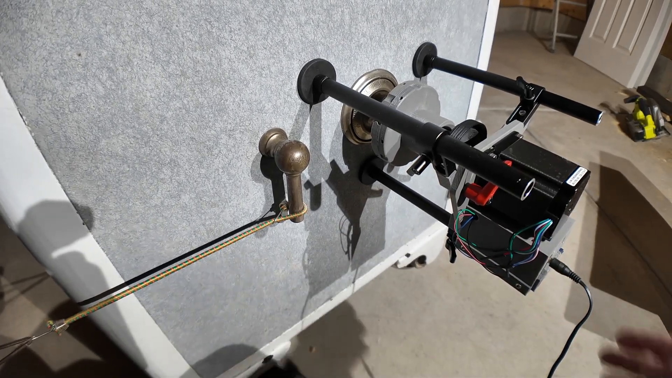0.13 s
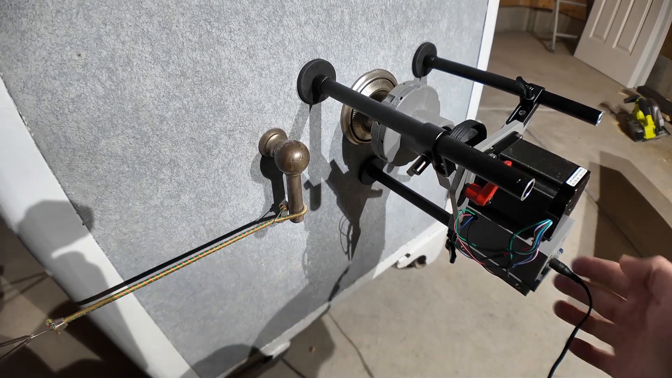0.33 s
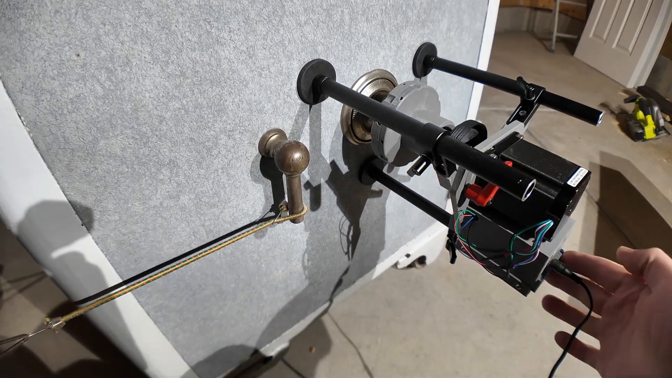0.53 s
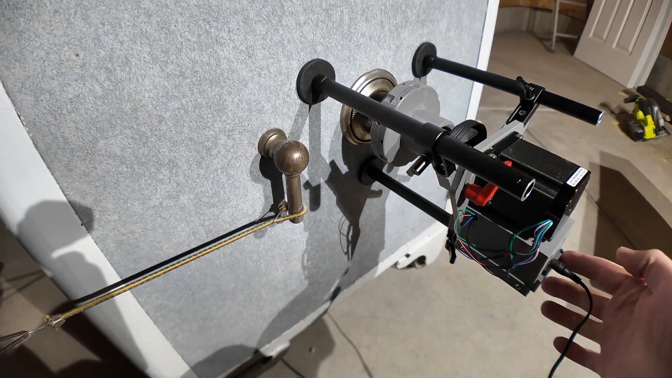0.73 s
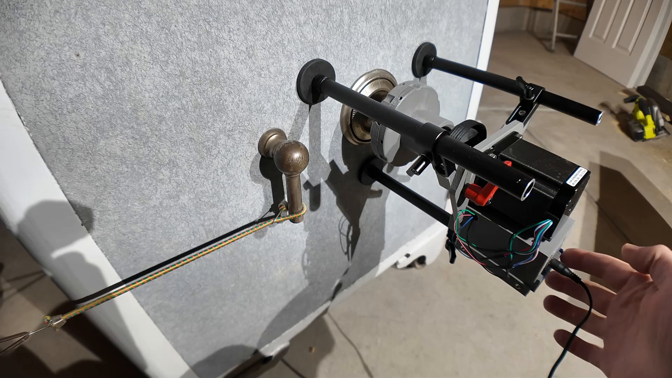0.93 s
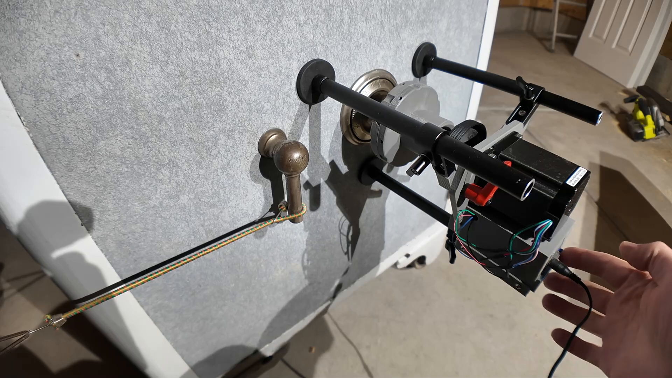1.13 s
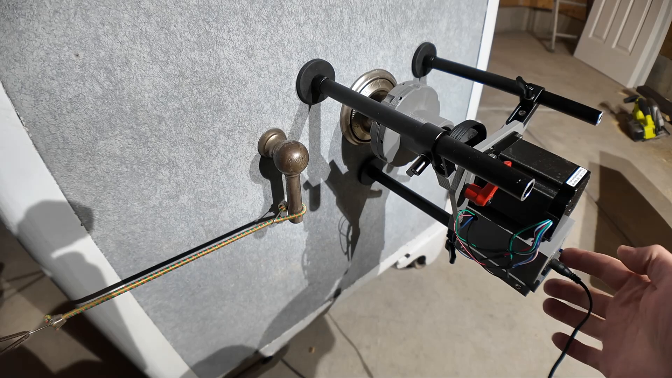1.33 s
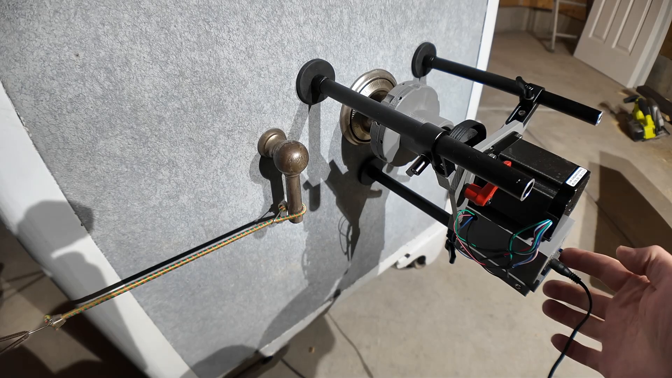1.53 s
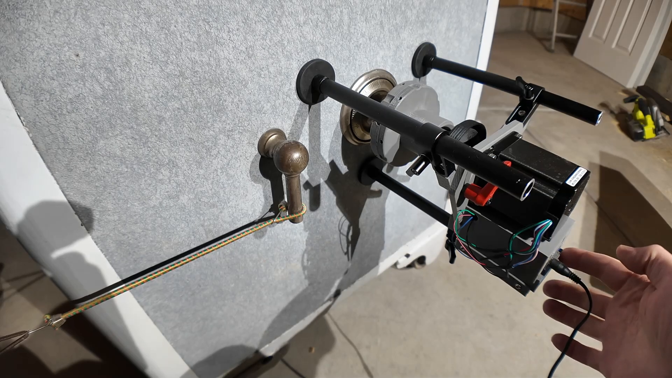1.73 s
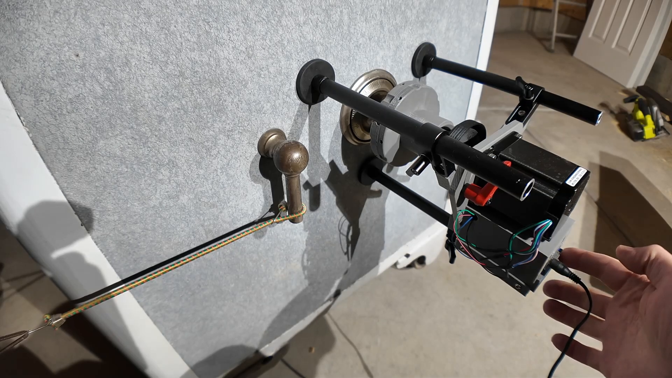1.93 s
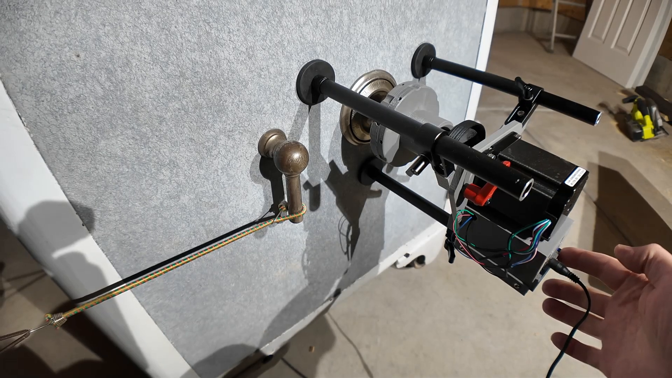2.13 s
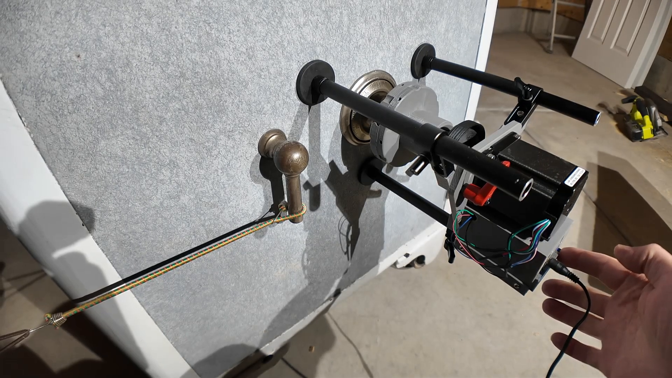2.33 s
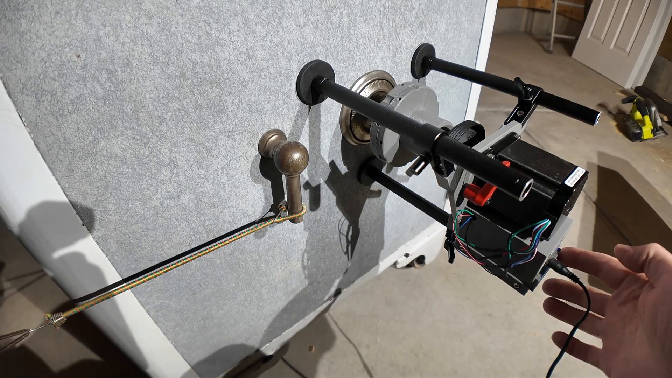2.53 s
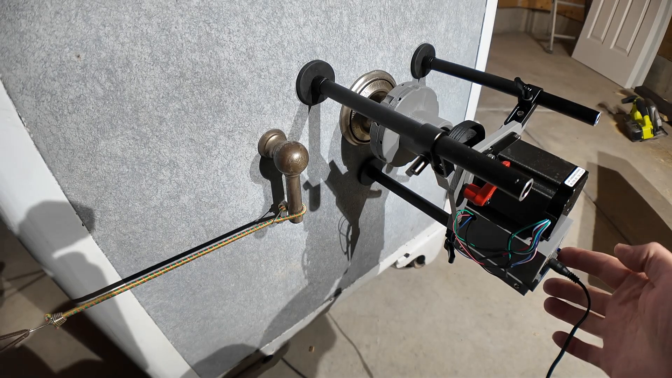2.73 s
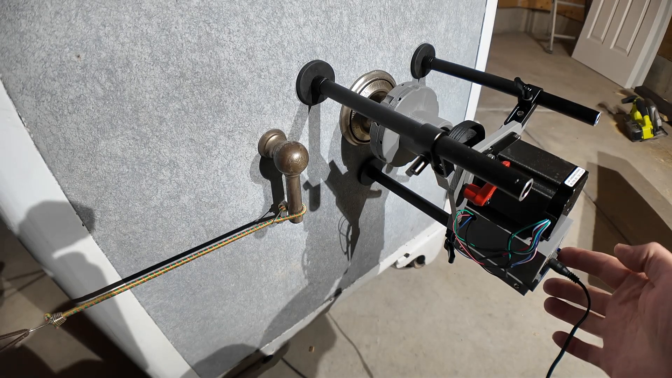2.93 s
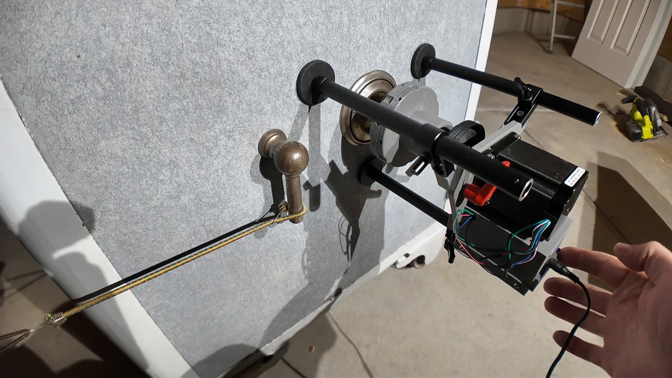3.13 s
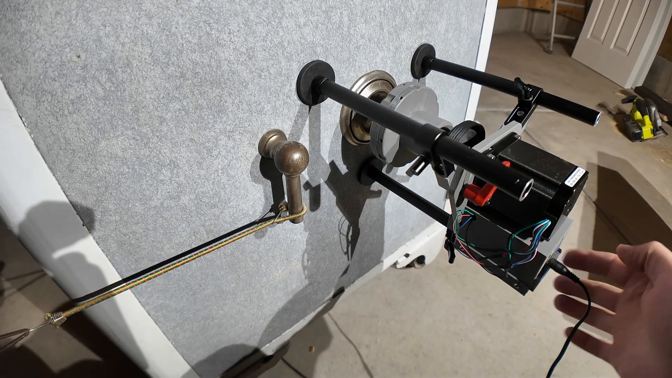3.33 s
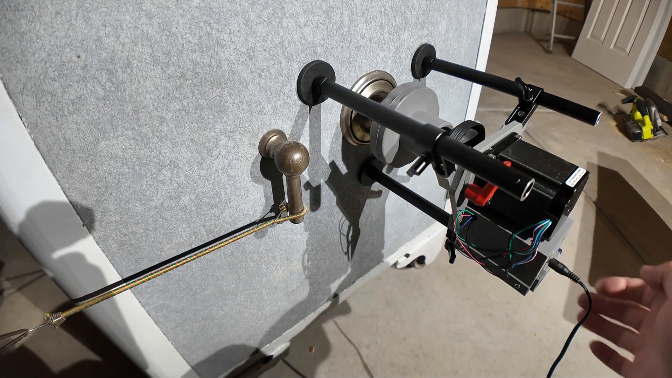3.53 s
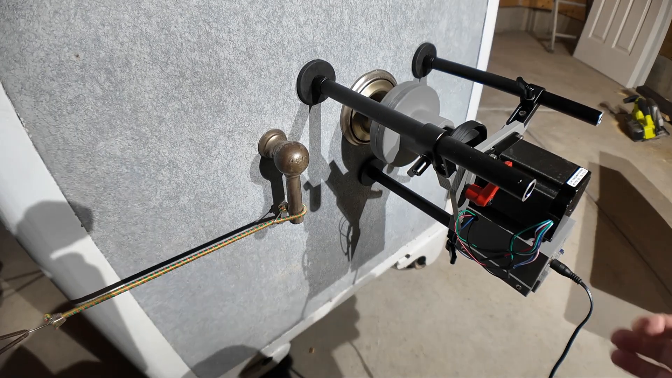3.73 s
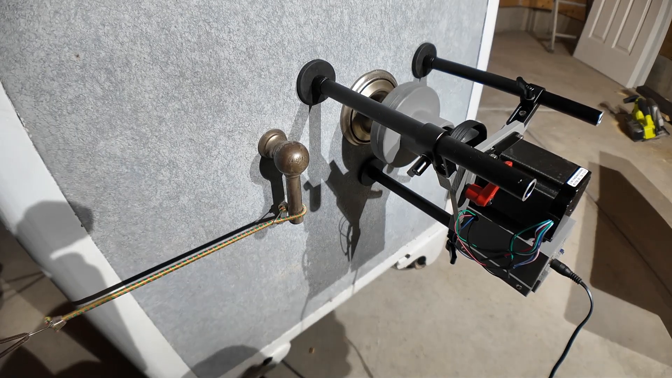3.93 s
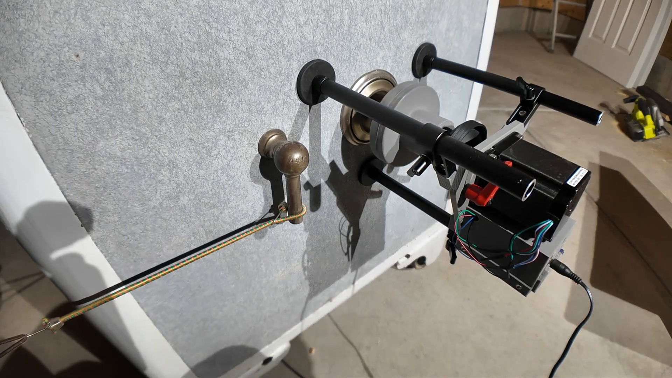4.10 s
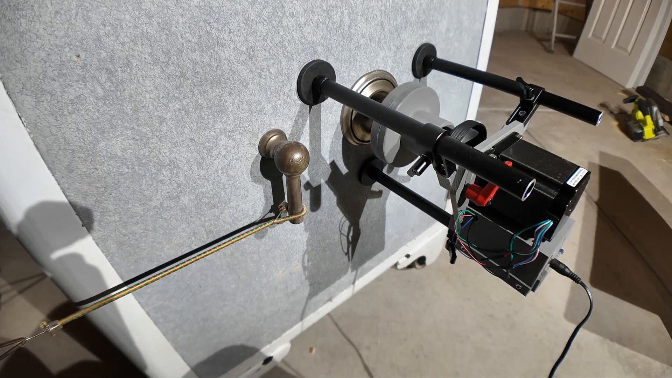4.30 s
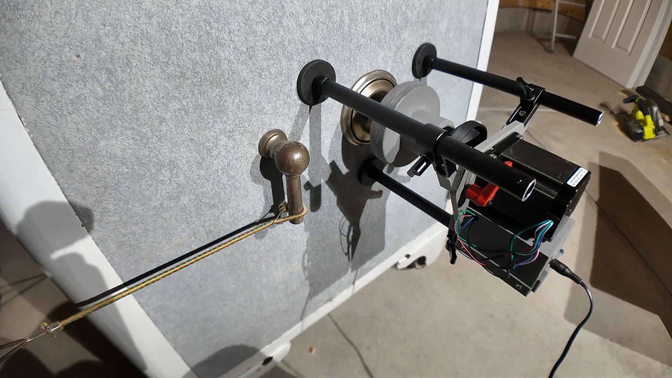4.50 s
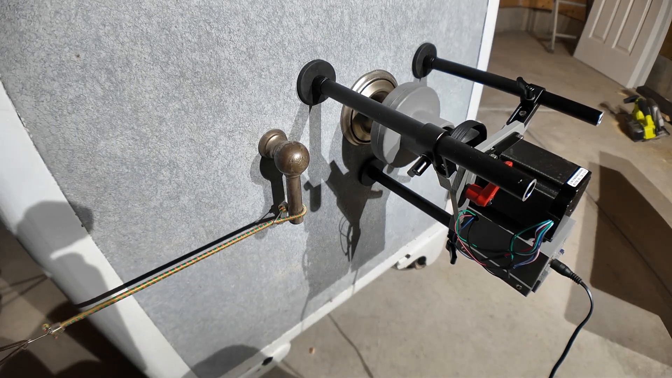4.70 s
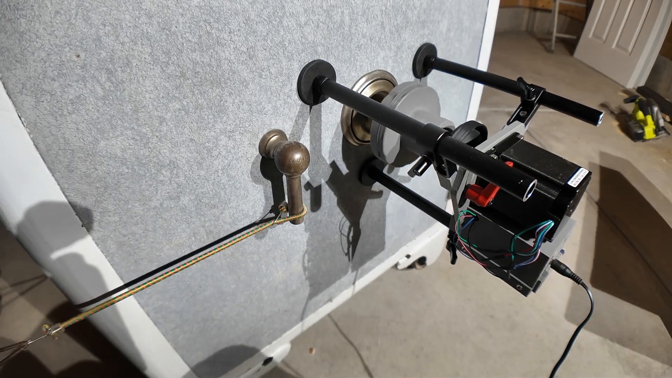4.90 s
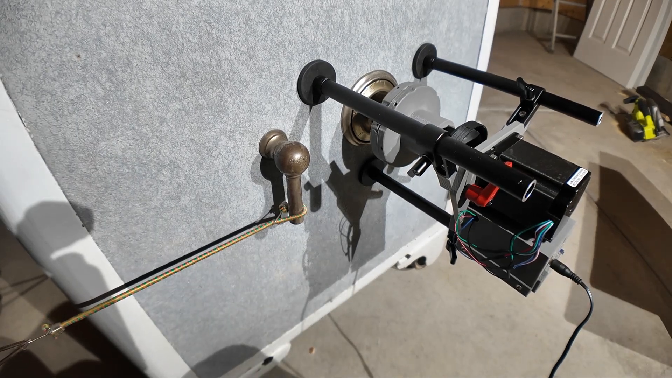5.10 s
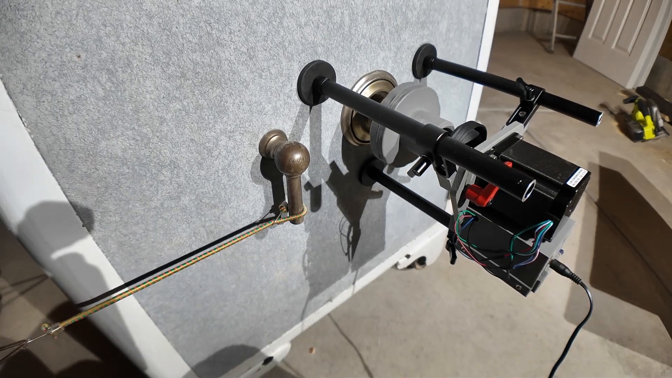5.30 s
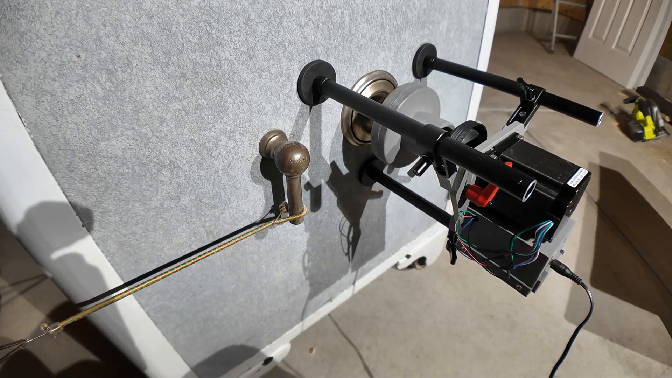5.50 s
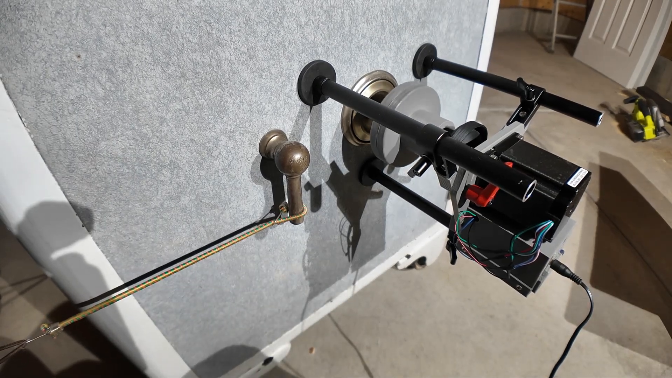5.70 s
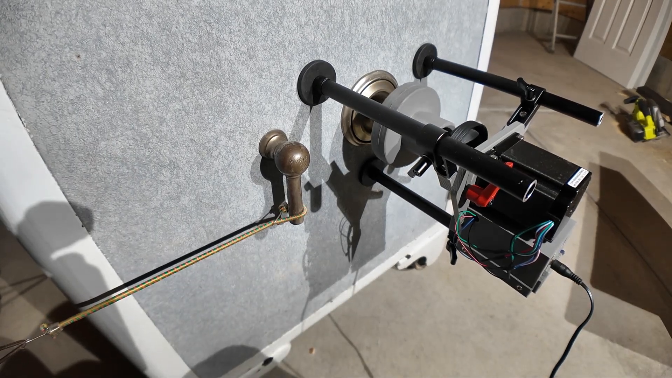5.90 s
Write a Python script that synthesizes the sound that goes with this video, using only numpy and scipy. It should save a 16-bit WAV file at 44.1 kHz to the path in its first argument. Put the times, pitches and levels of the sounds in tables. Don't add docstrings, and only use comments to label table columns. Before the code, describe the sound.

A few small plastic clicks, a quiet pause, then a ticking, buzzing stepper motor turns a metal lock dial one way and back.

```python
import sys
import numpy as np
from scipy import signal
from scipy.fft import rfft, irfft, next_fast_len
from scipy.io import wavfile

SR = 44100
rng = np.random.default_rng(int(sys.argv[2]) if len(sys.argv) > 2 else 0)


def gain_from_db(level_db):
    decades = np.asarray(level_db, float) / 20
    return 10 ** decades


def transcribe(signal):
    frames = np.atleast_2d(signal).T
    limited = np.clip(frames, -1, 1)
    pcm = np.round(limited * 32767).astype(np.int16)
    wavfile.write(sys.argv[1], SR, pcm)


N = 262395

# (frequency [Hz], density [dB per Hz])
AIR_SPECTRUM = [(18, -56), (30, -48), (47, -20), (88, -0.5), (117, -10.5), (148, -4.5), (188, -17.5),
                (214, -10), (317, -17.5), (677, -19), (880, -19), (10900, -35), (15700, -26.5)]
AIR_DB = -55.5
# (frequency [Hz], correlation [-1 to 1])
AIR_CORRELATION = [(60, 1), (240, -0.14), (950, -0.45), (3770, 0.3), (15000, -0.43)]
MAINS_DB = [-72.5, -78, -75.5]
# (time [s], spread [s], level [dB])
MAINS_SWELLS = [
    [(.5, 0.37, -62), (1.7, 0.21, -64), (4.09, .06, -84)],
    [(.53, 0.14, -63.5), (1.3, 0.13, -61), (1.77, 0.081, -57), (2.25, .22, -55.5), (4.5, .08, -76),
     (5.3, 0.095, -52)],
    [(.15, 0.11, -69), (3.15, 0.2, -57), (3.6, 0.049, -55), (4.05, 0.19, -60.5), (5.15, 0.37, -53.5),
     (5.7, .15, -62)],
]
MAINS_HZ = 59.2

ROOM_T60_S, ROOM_DB, EARLY_DECAY_S = 0.37, -9.5, 0.0061
# (frequency [Hz], lead [rad])
LEFT_LEAD = [(100, 0), (5000, .3), (6800, -3.5), (9800, -9.5), (16000, -13)]
# (frequency [Hz], correlation [0 to 1])
SOURCE_CORRELATION = [(60, 0.95), (150, 1), (560, 0.96), (950, 0.94), (2380, 0.7), (5980, 0.32),
                      (15000, 0.055)]
# (frequency [Hz], level [dB])
LEFT_BALANCE = [(60, -3), (150, 1.5), (380, 0), (950, -0.5), (2380, 0.5), (5980, 2), (15000, -2.5)]
BANDWIDTH_HZ = 15740

# (time [s], peak level [dB], low colour [dB], high colour [dB])
TAPS = [
    (0.5142, -48.5, -3, 4),
    (0.7058, -40, 3.5, -7),
    (0.8215, -30, -1, 1),
    (1.0014, -55.5, -5, 12.5),
    (1.2032, -48.5, 17.5, 0),
    (1.2124, -50.5, 6, 6.5),
]
# (frequency [Hz], level [dB], T60 [s], colour group [0 low, 1 mid, 2 high])
BOX_MODES = [(733, 8, 0.062, 0), (604, -3, 0.031, 0), (1120, 13.5, 0.02, 1), (1257, 3, 0.054, 1),
             (2250, 5, 0.0092, 2), (2570, -17, 0.011, 2), (3170, -3, 0.011, 2), (3600, 4, 0.0086, 2),
             (10400, -3, 0.0057, 2)]

# (time [s], level [dB])
JOLTS = [
    (3.39, -50.5),
    (3.88, -54),
    (4.1, -48),
    (4.52, -66),
    (5.11, -58),
    (5.28, -55),
    (5.54, -64),
    (5.71, -61.5),
]
SHUDDER_DB, SHUDDER_SPREAD_S = -64, 0.042
# (frequency [Hz], width [Hz], time [s], spread [s], level [dB])
DOOR_BOOM = (145, 14, 5.4, .13, -55)
# (frequency [Hz], width [Hz], level [dB])
FRAME_MODES = [(690, 64, 20), (1195, 330, -1), (1413, 210, 9.5), (1790, 213, 9.5), (2250, 120, 4.5),
               (2706, 110, 1), (3150, 60, 6), (3453, 21, 9.5), (3630, 24, 1), (4220, 210, -4.5),
               (4650, 19, 9)]

# (time [s], peak level [dB], low colour [dB], high colour [dB])
TICKS = [(3.3759, -21.5, -4, -9.5), (3.391, -25.5, 3, -12), (3.4056, -21, -3, -6.5),
         (3.4309, -23, 3.5, -21), (3.465, -11.5, -6, -4), (3.5937, -40, 15, -3), (3.6222, -25, 5.5, -7),
         (3.643, -25.5, 0, -5), (3.685, -23.5, 1.5, -24), (3.706, -18.5, -11.5, -12),
         (3.7784, -12.5, -4.5, -17), (3.8534, -19, -24, -15), (4.1124, -14.5, -4.5, -27),
         (4.176, -18.5, -11, -45), (4.233, -26, -17, -19), (4.3286, -15, -46, -19.5),
         (4.488, -18.5, -6, -19), (4.565, -19.5, -24, -28), (4.625, -19.5, -31, -22),
         (4.732, -15.5, -24, -31), (4.9204, -20.5, 1.5, -15), (5.268, -37, -4, 1), (5.2964, -16.5, -8, -12),
         (5.458, -46, -20, 8), (5.5767, -16, -5.5, -8), (5.6454, -13.5, -8.5, -24), (5.685, -18, -21, -18),
         (5.7816, -16.5, -16, -15), (5.872, -22, -3, -1.5), (5.922, -17.5, -8.5, -6.5)]
TICK_S = 0.002
# (frequency [Hz], width [Hz], level [dB], angle [turns], swell [dB], first-turn extra [dB])
CHATTER = (5178, 110, -61, -7.3, 15, 10.5)
# (frequency [Hz], density [dB per Hz])
RATTLE_SPECTRUM = [(200, -32), (430, -30), (540, -11), (700, -25), (900, -14.5), (1150, -10.5), (1600, -17),
                   (2300, -9.5), (2750, -16), (3800, -7), (5000, -18), (6500, -21.5), (11000, -26.5),
                   (15500, -43)]
# (time [s], spread [s], level [dB])
BREAKAWAY = (3.43, 0.054, 1.9)
# (frequency [Hz], width [Hz], level [dB], share locked to the steps [0 to 1])
COIL_MODES = [(12050, 300, 0, .75), (15100, 650, -1, .75)]
UPPER_COIL_SLOW_DB = -19

# (time [s], rate [full steps/s])
STEP_RATE = [
    (3.39, 4),
    (3.828, 532.9),
    (4.762, 532.9),
    (5.19, 15),
    (5.612, 532.9),
    (5.95, 532.9),
]
STEPS_PER_TURN, REVERSE_S = 200, 5.19
# (multiple [1], level [dB], wander [dB], dial angle of the swell [turns])
OVERTONES = [(2, -52, 3, .33), (3, -55, 5, .45), (4, -57, 4, .1), (5, -55, 5, .85), (6, -54, 6, .8),
             (7, -55, 5, .37), (9, -58, 4, .3)]
OVERTONE_RAMP_DB, OVERTONE_RUN_DB = -11, 6
# (multiple [1], level [dB])
MICROSTEP_LINES = [(16, -51), (21.5, -57), (24, -58), (32, -56)]
# (frequency [Hz], width [Hz], level [dB])
WHINE_MODES = [(1240, 60, 16.5), (700, 60, 11)]
# (time [s], depth [1], length [s])
CATCHES = [
    (3.857, 1.95, 0.0043),
    (3.976, 1.8, 0.0048),
    (4.161, 0.94, 0.0043),
    (4.208, 1.85, 0.0046),
    (4.534, 1.75, 0.00455),
    (5.765, 0.88, 0.0088),
]
SPEEDING_UP_DB, SPEEDING_UP_HUM_DB = 2, -7.5

# (rate [steps/s], step hum [dB], microstep whine [dB],
# low rattle [dB], high rattle [dB], coil hiss [dB])
BY_SPEED = [(10, -88, -12, -31, -45, -60), (79.5, -72, -40, -31, -42.5, -51),
            (150, -49, -37.5, -39.5, -38.5, -50.5), (196, -45, -35.5, -39, -41.5, -47),
            (292, -41, -38.5, -33, -38, -47), (324, -57.5, -34.5, -39, -37, -46),
            (466, -37.5, -41, -31.5, -29, -40), (530, -28.5, -54, -31.5, -29, -44.5)]
# (angle [turns], hum [dB], low rattle [dB], high rattle [dB], coils [dB])
DIAL_BINDING = [(.03, 0, 3.5, 4, -10.5), (.16, 0.8, 1.6, -0.4, -8.5), (.36, 8.5, 3.5, 2.3, -13),
                (.53, -0.5, 1.4, -0.6, -9.2), (.7, 0.5, 2.5, 2.5, -10), (.8, 1, 1, 0.5, -12),
                (.9, 1.7, 0.2, 0, -10)]
BIND_POWER = 2.8
SLACK_TURNS, BACK_DEPTH = 0.13, 1.07
# (hum [dB], low rattle [dB], high rattle [dB], coils [dB])
BACK_DB = [-11, 1.9, -2, 0.5]
# (time [s], spread [s])
PICKUP_TIME = (3.81, 0.17)
# (hum [dB], low rattle [dB], high rattle [dB], coils [dB])
PICKUP_DB = [-0.5, 5, 2, 1.5]


def rms_one(x):
    return x / np.sqrt(np.mean(x ** 2) + 1e-20)


def in_time(rows):
    s, *columns = np.transpose(rows)
    return [np.interp(np.arange(N) / SR, s, c) for c in columns]


def at_hz(points, hz):
    table_hz, value = np.transpose(points)
    return np.interp(np.log(hz + 1), np.log(table_hz + 1), value)


def swell(s, spread):
    return np.exp(-.5 * ((np.arange(N) / SR - s) / spread) ** 2)


def drift(rate):
    r = np.exp(-80 * np.pi * rate / SR)
    noise = rng.standard_normal(N // 40 + 2002)
    slow = signal.lfilter([1], [1, -2 * r, r * r], noise)[2000:]
    return np.interp(np.arange(N) / 40, np.arange(len(slow)), rms_one(slow))


def colour(x, spectrum):
    return irfft(rfft(x) * gain_from_db(at_hz(spectrum, np.fft.rfftfreq(N, 1 / SR))), N)


def band(x, low_hz, high_hz):
    return signal.sosfilt(signal.butter(2, [low_hz, high_hz], "band", fs=SR, output="sos"), x)


def resonance(x, hz, width):
    r = np.exp(-np.pi * width / SR)
    return signal.lfilter([(1 - r * r) / 2, 0, (r * r - 1) / 2],
                          [1, -2 * r * np.cos(2 * np.pi * hz / SR), r * r], x + 1e-18)


def frame(x):
    return x + sum(gain_from_db(db) * resonance(x, hz, width) for hz, width, db in FRAME_MODES)


def room_air():
    hz = np.fft.rfftfreq(N, 1 / SR)
    mid, side = rfft(rng.standard_normal((2, N))) * gain_from_db(at_hz(AIR_SPECTRUM, hz))
    alike = at_hz(AIR_CORRELATION, hz)
    air = irfft(np.sqrt(1 + alike) * mid + np.sqrt(1 - alike) * side * [[1], [-1]], N)
    turns = 2 * np.pi * MAINS_HZ * np.arange(N) / SR
    hum = 0
    for k, (db, rows) in enumerate(zip(MAINS_DB, MAINS_SWELLS), 1):
        size = gain_from_db(db) + sum(gain_from_db(top_db) * swell(s, spread) for s, spread, top_db in rows)
        hum = hum + size * gain_from_db(1.6 * drift(1.5)) * np.sin(k * turns + 1.2 * drift(0.68))
    return gain_from_db(AIR_DB - 3.5) * rms_one(air) + hum


def space(x):
    size = next_fast_len(N + SR)
    hz, t = np.fft.rfftfreq(size, 1 / SR), np.arange(SR) / SR
    alike = at_hz(SOURCE_CORRELATION, hz)
    side = np.array([[1], [-1]])
    early = rng.standard_normal((2, SR)) * np.exp(-t / EARLY_DECAY_S)
    late = rng.standard_normal((2, SR)) * gain_from_db(-60 * t / ROOM_T60_S) * (t > .02)
    early, late = [rfft(h / np.sqrt(np.sum(h ** 2, axis=1, keepdims=True)), size) for h in (early, late)]
    shake = 2.43 * drift(8.45)
    scattered = np.sum(rfft(x * [np.cos(shake), np.sin(shake)], size) * early, axis=0)
    direct = rfft(x, size)
    lead = np.exp(.5j * side * at_hz(LEFT_LEAD, hz))
    near = (np.sqrt(1 + alike) * direct + side * np.sqrt(1 - alike) * scattered) * lead / np.sqrt(2)
    dull = 1 / np.sqrt((1 + (hz / 1800) ** 4) * (1 + (750 / (hz + 1)) ** 6))
    tail = gain_from_db(ROOM_DB) * dull * late * direct
    return irfft((near + tail) * gain_from_db(side * at_hz(LEFT_BALANCE, hz) / 2), size)[:, :N]


def taps():
    s, peak_db, low_db, high_db = np.transpose(TAPS)
    at = (s * SR).astype(int)
    group_db = [low_db, 0 * low_db, high_db]
    strength = rng.normal(0, 1.5, (len(TAPS), len(BOX_MODES)))
    out = 0
    for k, (hz, db, t60, group) in enumerate(BOX_MODES):
        clicks = np.zeros(N)
        clicks[at] = gain_from_db(peak_db + db - 14.5 + group_db[int(group)] + strength[:, k])
        r, w = gain_from_db(-60 / (t60 * SR)), 2 * np.pi * hz / SR
        out = out + signal.lfilter([0, np.sin(w)], [1, -2 * r * np.cos(w), r * r], clicks + 1e-18)
    crack, door = (2, -4, 0.075, 2140, 3140), (0, -17, 0.95, 540, 1350)
    for group, db, t60, low_hz, high_hz in [crack, door]:
        clicks = np.zeros(N)
        clicks[at] = gain_from_db(peak_db + db + group_db[group])
        decay = signal.lfilter([1], [1, -gain_from_db(-60 / (t60 * SR))], clicks + 1e-18)
        out = out + band(decay * rng.standard_normal(N), low_hz, high_hz)
    return band(band(out, 610, 14000), 450, 15000)


def shudder():
    size = gain_from_db(SHUDDER_DB) + sum(gain_from_db(db) * swell(s, SHUDDER_SPREAD_S) for s, db in JOLTS)
    hz, width, s, spread, db = DOOR_BOOM
    noise = band(rng.standard_normal(N), 75, 310)
    boom = gain_from_db(db) * swell(s, spread) * rms_one(resonance(noise, hz, width))
    return size * rms_one(resonance(noise, 79, 27)) + boom


def ticks():
    length = 1500
    layers = np.zeros((3, N + 2000))
    grain = rng.standard_normal((len(TICKS), length)) * rng.standard_normal((len(TICKS), length))
    age = np.arange(length) / SR / TICK_S
    for (s, db, low_db, high_db), g in zip(TICKS, grain):
        burst = g * age ** 2 * np.exp(-age) * gain_from_db(db)
        start = round(s * SR)
        layers[:, start:start + length] += burst * gain_from_db([[low_db + 4], [0], [high_db]])
    low, mid, high = layers[:, :N]
    body = frame(band(low, 600, 1600) + band(mid, 1800, 5800)) * gain_from_db(-3)
    return body + band(band(high, 5500, 12000), 5000, 13000)


def dial_turn(rate):
    back = np.arange(N) / SR > REVERSE_S
    return np.cumsum(np.where(back, -rate, rate)) / SR / STEPS_PER_TURN - SLACK_TURNS * back


def levels(rate):
    back = np.arange(N) / SR > REVERSE_S
    angle = dial_turn(rate) % 1
    share = rate / rate.max()
    speeds, hum_db, whine_db, *others = np.transpose(BY_SPEED)
    angles, *binds = np.transpose(DIAL_BINDING)
    grip = share ** BIND_POWER
    depth = grip * np.where(back, BACK_DEPTH, 1)
    pickup = swell(*PICKUP_TIME)
    four = []
    for db, bind, back_db, pickup_db in zip([hum_db, *others], binds, BACK_DB, PICKUP_DB):
        binding_db = depth * np.interp(angle, angles, bind, period=1)
        four.append(np.interp(rate, speeds, db) + binding_db + grip * back * back_db + pickup_db * pickup)
    overtone_db = OVERTONE_RAMP_DB + share * (OVERTONE_RUN_DB - OVERTONE_RAMP_DB)
    return four, np.interp(rate, speeds, whine_db), overtone_db


def chatter(rate):
    hz, width, db, turn, swell_db, first_db = CHATTER
    hits = (rng.random(N) < 900 / SR) * rng.standard_normal(N)
    near_angle = np.cos(2 * np.pi * (dial_turn(rate) - turn))
    level_db = db + swell_db * near_angle + first_db * swell(3.78, 0.23)
    ring = rms_one(resonance(resonance(hits, hz, width), hz, 4 * width))
    return gain_from_db(level_db) * (rate / rate.max()) ** 2 * ring


def rattle(low_db, high_db):
    strength = gain_from_db(4.0 * np.minimum(rng.exponential(1, N), 4.2))
    hits = (rng.random(N) < 6500 / SR) * strength * rng.choice([-1, 1], N)
    body = rms_one(colour(frame(hits * gain_from_db(1.2 * drift(50))), RATTLE_SPECTRUM))
    edges = np.geomspace(200, 15500, num=15)
    high_share = np.clip(np.log2(edges / 1300) / 1.5, 0, 1)
    out = 0
    for low_hz, high_hz, share in zip(edges, edges[1:], high_share):
        level_db = 5.0 + low_db + share * (high_db - low_db) + 1.21 * drift(18.0)
        out = out + band(body, low_hz, high_hz) * gain_from_db(level_db)
    return out


def coils(cycles, rate, hiss_db):
    step = np.floor(cycles + .007 * drift(20))
    pulse = np.diff(step, prepend=0) > 0
    speed = rate / rate.max()
    out = 0
    for (hz, width, db, locked), sign in zip(COIL_MODES, [(-1) ** step, 1]):
        share = locked * speed ** 6
        blur = rng.standard_normal(N) * gain_from_db(0.67 * drift(60))
        drive = share * rms_one(pulse * sign) + (1 - share) * blur
        slow_db = (hz > 14000) * UPPER_COIL_SLOW_DB * (1 - speed) ** 2
        ring = rms_one(resonance(resonance(drive, hz, width), hz, 3 * width))
        out = out + gain_from_db(db + slow_db + 2 * drift(12)) * ring
    return gain_from_db(hiss_db - 0.5) * out


def hum_and_whine(cycles, rate, hum_db, whine_db, overtone_db):
    t, turns = np.arange(N) / SR, 2 * np.pi * cycles
    share, dial, pulling = rate / rate.max(), dial_turn(rate), np.diff(rate, prepend=0) > 0

    flip = 1 - sum(depth * np.exp(-((t - s) / length) ** 6) for s, depth, length in CATCHES)
    damping_db = SPEEDING_UP_HUM_DB * pulling * (1 - share ** 4)
    waver_db = (4 - 2.8 * share ** 4) * drift(30)
    hum = gain_from_db(hum_db + damping_db + waver_db) * flip * np.sin(turns + .3 * drift(10))

    source = gain_from_db(whine_db - 4 + 3 * drift(45)) * np.sin(8 * turns + .75 * drift(60))
    whine = band(band(source, 600, 2500), 500, 3300)
    pulled = source * gain_from_db(SPEEDING_UP_DB * pulling)
    for hz, width, db in WHINE_MODES:
        whine = whine + gain_from_db(db) * resonance(resonance(pulled, hz, width), hz, 4 * width)

    rest = 0
    for k, db, wander_db, turn in OVERTONES:
        wander = .5 * drift(1.3) + share * np.cos(2 * np.pi * (dial - turn))
        rest = rest + gain_from_db(db + wander_db * wander) * np.sin(k * turns + 0.31 * wander_db * drift(35.0))
    rest = frame(band(band(rest, 600, 4500), 550, 5000))

    upper = sum(gain_from_db(db + 4 * drift(30)) * np.sin(k * turns + .9 * drift(60)) for k, db in MICROSTEP_LINES)
    upper = frame(band(band(upper, 900, 4600), 900, 5200))
    return gain_from_db(1.5) * upper + np.sqrt(2) * (hum + whine) + gain_from_db(np.minimum(overtone_db, 5)) * rest


def scene():
    running = np.arange(N) / SR > TICKS[0][0]
    rate = in_time(STEP_RATE)[0] * running
    cycles = np.cumsum(rate) / SR
    (hum_db, low_db, high_db, hiss_db), whine_db, overtone_db = levels(rate)
    s, spread, loose_db = BREAKAWAY
    motor = shudder() + chatter(rate)
    motor = motor + rattle(low_db + loose_db * swell(s, spread), high_db)
    motor = motor + coils(cycles, rate, hiss_db)
    motor = motor + hum_and_whine(cycles, rate, hum_db, whine_db, overtone_db)
    return room_air() + space(taps() + ticks() + running * motor)


def top_cut(x):
    return signal.sosfilt(signal.butter(12, 16540, fs=SR, output="sos"), x)


def record(dry):
    top = signal.ellip(12, .5, 70, BANDWIDTH_HZ, fs=SR, output="sos")
    mix = signal.sosfilt(top, dry)
    return top_cut(mix)


dry = scene()
out = record(dry)
transcribe(out)
```